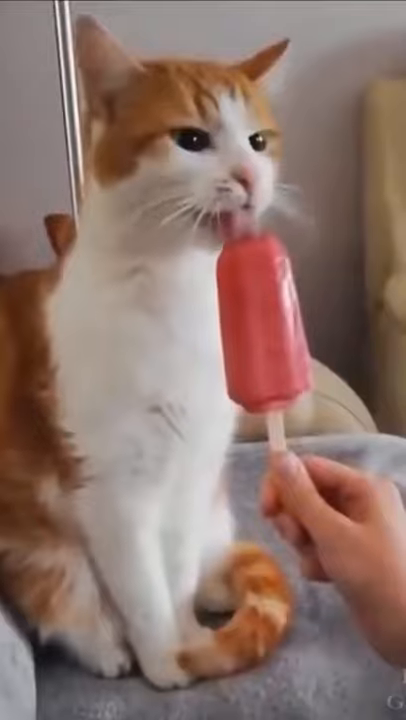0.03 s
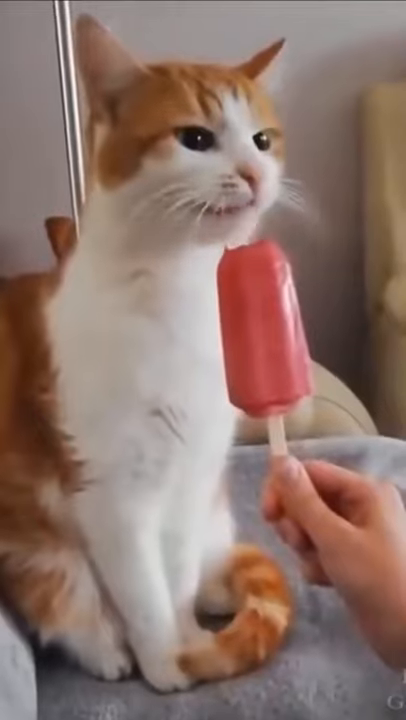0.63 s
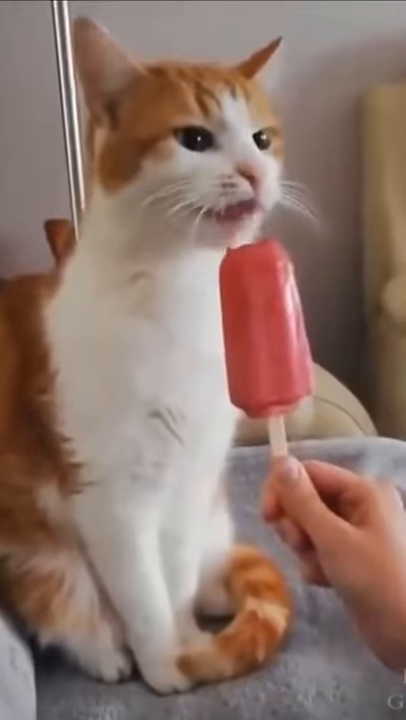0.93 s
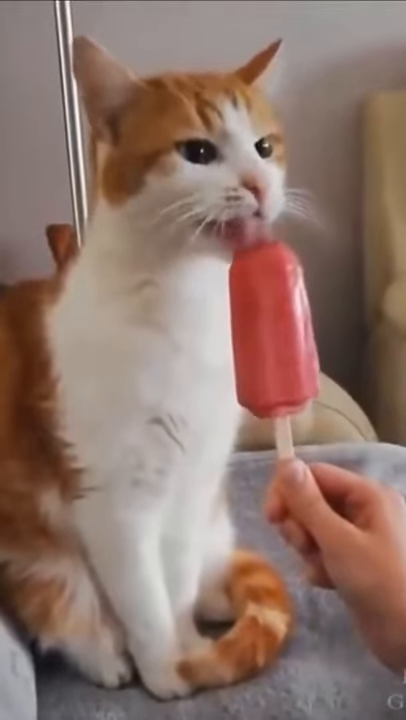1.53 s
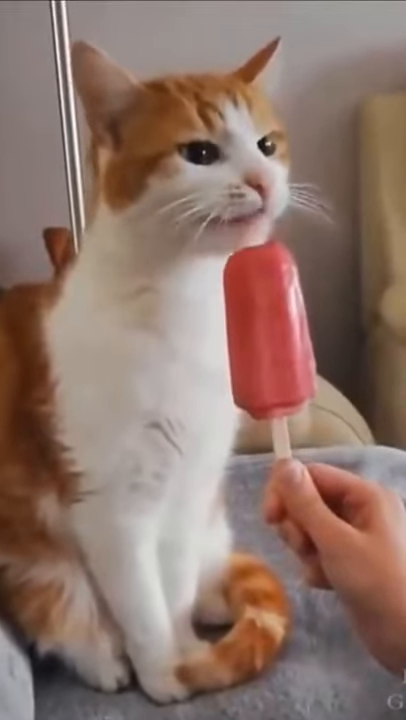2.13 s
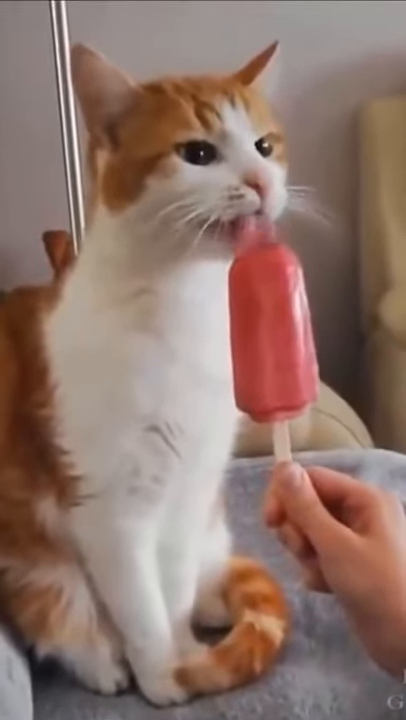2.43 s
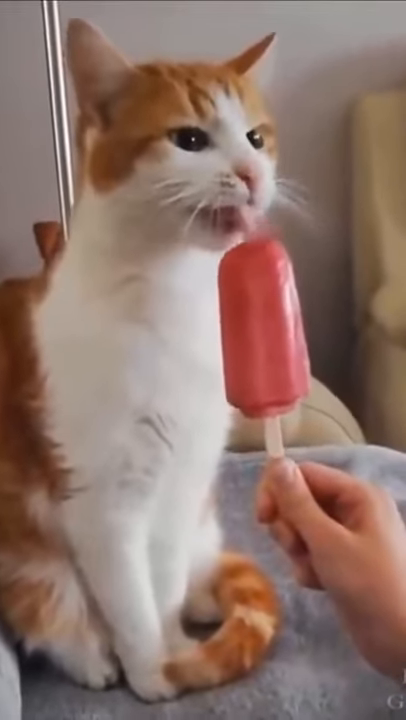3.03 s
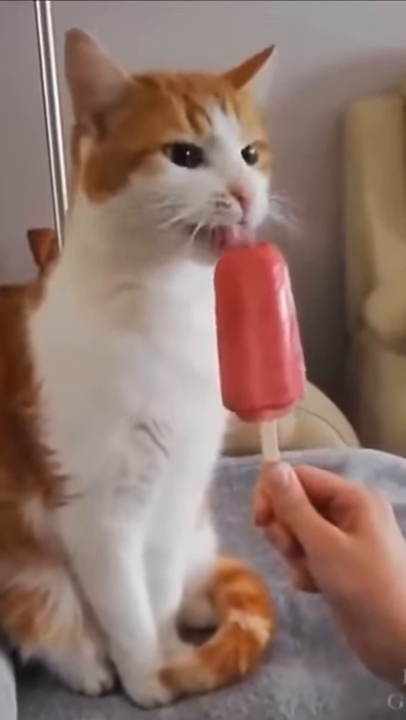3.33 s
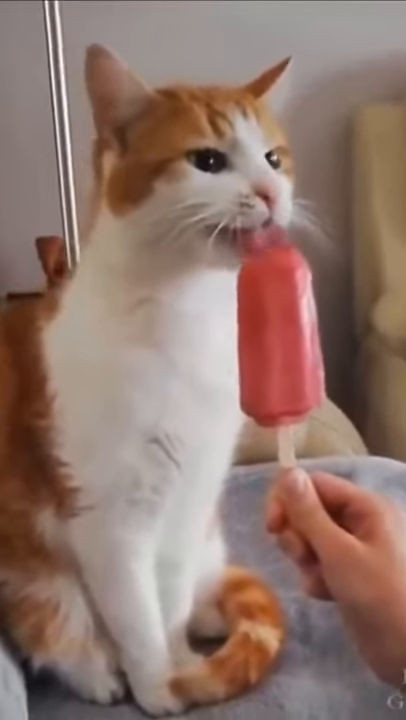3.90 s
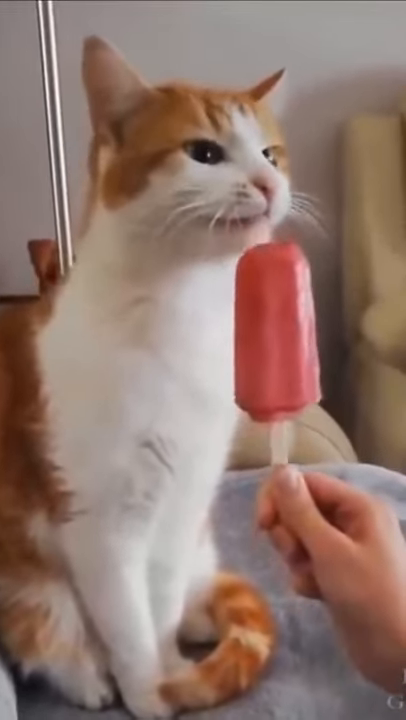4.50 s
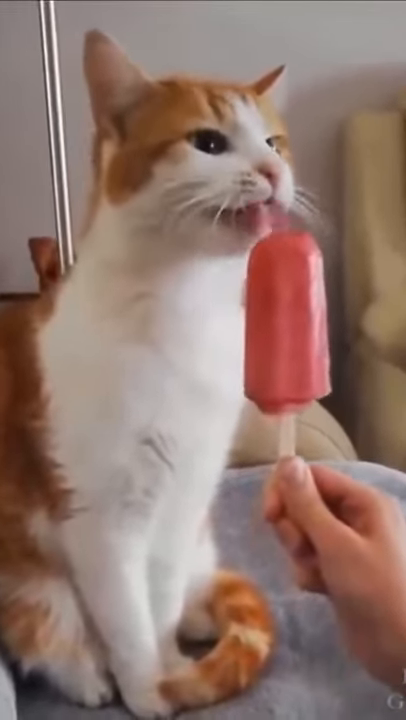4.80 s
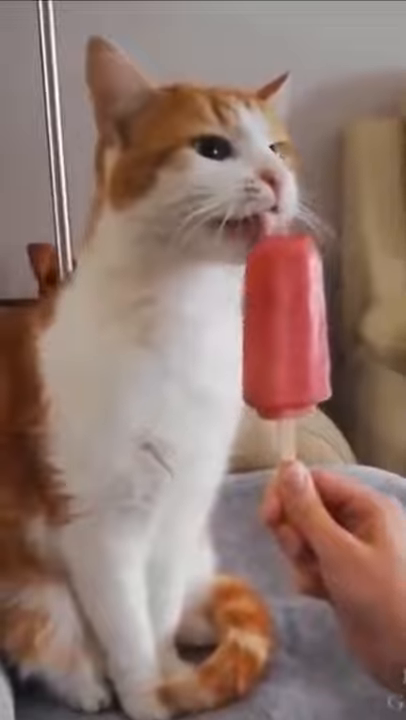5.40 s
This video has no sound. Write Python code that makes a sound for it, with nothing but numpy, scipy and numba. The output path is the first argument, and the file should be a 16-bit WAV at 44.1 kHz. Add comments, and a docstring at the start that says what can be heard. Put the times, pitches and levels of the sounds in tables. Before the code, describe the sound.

A cat licks a frozen treat very close to the microphone, in a quiet room with no echo. From the very start, wet smacks and tongue clicks come several times a second in an uneven rhythm. Each lick has a bright crackle of saliva, a short, hollow smack and a soft, low thump as the tongue lets go. Brief sticky drags and tiny bubble snaps fall in between.

The licks are strong through the first second, ease briefly around 1.5 to 1.8 seconds, and stand out again near 2.5 seconds and from 2.9 to 3.7 seconds. After about 4 seconds they are somewhat lighter, with a few small plops and clearer smacks near 4.4 and 4.8 seconds. A faint rumble and thin hum lie underneath, growing slightly. The last lick comes at about 5 seconds, and everything falls silent by 5.2 seconds.

```python
"""Close, wet licking

Wet licking and smacking mouth sounds, very close by, several a second, in a quiet room with no echo.
In each lick a film of saliva tears with a bright crackle, the tongue peels off in tiny pops that make
the opening mouth ring, and it lets go with a soft, low thump. Now and then the tongue drags, bubbles
snap and air pockets plop, all over a faint rumble and hum."""
import sys
import numpy as np
from scipy import signal
from scipy.fft import rfft, irfft
from scipy.io import wavfile
from scipy.ndimage import uniform_filter1d
from numba import njit

SR = 44100
rng = np.random.default_rng(int(sys.argv[2]) if len(sys.argv) > 2 else 0)


def log_audio(samples):
    """Write samples as a 16-bit WAV file to the path given in sys.argv[1]."""
    # one column per channel
    frames = np.atleast_2d(samples).T
    # limit to full scale, then quantise
    limited = np.clip(frames, -1, 1)
    pcm = np.round(limited * 32767).astype(np.int16)
    wavfile.write(sys.argv[1], SR, pcm)


N = 249297

# The licks. Each row: start in seconds, contact time in seconds, smack level in dB, mouth pitch in Hz,
# throat level in dB compared with the mouth, film level in dB, film pitch in Hz, thump level in dB.
# Levels in all tables are relative: they say which sounds are louder than others.
LICKS = [(.003,0.04,-17.5,1490,-6.5,-25.5,3030,-25.5), (0.182,.009,-19.5,1465,-9,-28,3680,-24),
         (.234,.026,-19,1320,-10.5,-31,2680,-19.5), (.28,0.011,-15.5,1215,-6.5,-32.5,2290,-26.5),
         (.431,0.048,-16.5,1180,-7,-27.5,3320,-9.5), (.645,0.039,-17,1510,-5.5,-18,2590,-17.5),
         (.803,0.045,-14,1200,-6.5,-34.5,2270,-16.5), (1.004,.015,-36.5,1120,-1,-30.5,2590,-36.5),
         (1.031,.006,-22,1460,-6.5,-20,3480,-34), (1.149,0.05,-21,1445,-3,-34,5100,-16),
         (1.236,0.064,-15.5,1334,-5,-31.5,2310,-35), (1.316,0.06,-32,1620,-2,-47.5,5130,-25.5),
         (1.494,0.024,-23,1350,-3,-24,2920,-16), (1.542,0.068,-41,1160,8.5,-54,2770,-39.5),
         (1.65,0.073,-29.5,1340,-2.5,-25.5,2960,-25), (1.773,0.0048,-35,1300,-2,-27.5,2900,-21),
         (1.881,0.045,-21.5,1370,-2,-17.5,2860,-24), (2.036,0.041,-18.5,1244,-12.5,-28,2380,-30),
         (2.098,0.026,-24.5,1090,-14,-40,2250,-23), (2.134,0.0062,-21,1104,-2.5,-44,2280,-20),
         (2.263,.015,-19.5,1010,-3,-32.5,4050,-16), (2.298,0.026,-33.5,1300,1,-21,2550,-13.5),
         (2.479,0.032,-14,1184,-4,-27,2820,-12), (2.636,.016,-29.5,1550,-4,-33,2800,-29.5),
         (2.737,0.0088,-27.5,1660,0,-26.5,4140,-29.5), (2.884,0.023,-15,1640,-8,-19.5,4030,-15.5),
         (3.051,.022,-14,1720,-11,-26.5,4330,-19.5), (3.248,0.0206,-17,1630,-4,-23.5,4630,-18),
         (3.413,.01,-21,1930,-2.5,-26.5,4340,-20), (3.503,0.01,-31,1600,-2,-28.5,4230,-34.5),
         (3.677,0.0078,-16.5,1410,-4.5,-22,3980,-15), (3.722,0.038,-29,1600,-9,-33,4100,-38),
         (3.886,0.012,-22,1340,-8.5,-28,3300,-18), (4.171,0.014,-28,1660,-4.5,-29.5,4430,-13.5),
         (4.222,0.017,-31.5,1700,0,-37,3130,-40), (4.312,0.023,-28,1200,-3.5,-29,3500,-16.5),
         (4.418,0.033,-19.5,1180,-4.5,-35,4220,-24), (4.69,0.013,-31,1130,-20,-29,2360,-40.5),
         (4.73,0.0035,-25.5,870,-5,-43,3200,-42), (4.79,0.026,-18.5,930,-3,-23,3640,-15.5),
         (5.008,.012,-27,1345,-1,-33,2570,-29.5)]
# The tongue dragging, tearing a film with no smack. Each row: start in seconds,
# contact time in seconds, level in dB, pitch in Hz, slide in octaves per 50 ms.
TONGUE_DRAGS = [(0.783, 0.0095, -23, 2390, 1.8), (1.172, 0.048, -23, 3930, -1.04),
                (1.328, 0.029, -29.5, 2340, 1.8), (1.624, 0.037, -27.5, 4360, 0.5),
                (1.664, 0.048, -23, 5200.0, 1.2), (2.467, 0.0028, -24.5, 4220, 1.8),
                (3.823, 0.066, -27.5, 3860, -0.2), (4.089, 0.025, -31.5, 3650, -0.33),
                (4.277, 0.041, -26.5, 2900.0, -0.1), (4.843, 0.041, -34.5, 4020, -0.45),
                (4.991, 0.013, -27, 3940, -2)]
# Single bubbles bursting. Each row: start in seconds, level in dB, pitch in Hz.
BUBBLE_SNAPS = [(0.181, -25, 1260), (0.4241, -16, 1380), (0.7622, -29, 2960), (0.986, -29.5, 1350),
                (1.1482, -31.5, 4260), (1.6079, -20.5, 3120), (2.0164, -22.5, 1460), (2.1821, -17, 1140),
                (2.6355, -21, 2350), (3.5026, -23, 4500), (3.583, -35, 2580), (3.7973, -32, 6890),
                (3.806, -27.5, 3970), (4.086, -31, 1700), (4.275, -26, 3560), (4.417, -45, 1200),
                (4.6426, -42, 3970), (4.789, -22.5, 1010), (4.987, -61, 5890), (5.059, -25, 1270)]
# Small air pockets. Each row: start in seconds, level in dB, starting pitch in Hz,
# slide in octaves per second, thump level in dB.
AIR_PLOPS = [(4.002, -22, 750, -73, -14), (4.129, -29.5, 676, -150, -25), (4.678, -23.5, 3160, -110, -37),
             (5.121, -30.5, 800, -39, -25.5)]
# The tone of the mouth from close by. Each row: frequency in Hz, boost or cut in dB.
MOUTH_TONE = [(220, 7), (420, 2.5), (620, 6.5), (800, 5.5), (1200, 5), (1750, -0.5), (2300, -5.5),
              (3600, 0), (4700, -3), (6000, 11), (9000, 1), (13000, 0.5)]
# The tone of the room's noise. Each row: frequency in Hz, level in dB.
ROOM_TONE = [(15, -20), (45, 0), (280, -12), (750, -21), (1600, -17), (2400, -29), (5000, -40),
             (13000, -44)]
# How loud the room is over time. Each row: time in seconds, level in dB.
ROOM_LOUDNESS = [(0, -36.5), (5.153, -31.5), (5.171, -94)]


def tongue_smacks():
    """The tongue peels off in pops that ring the throat and two rising notes of the opening mouth."""
    out = np.zeros((2, N))
    for start, contact, db, hz, throat_db, *_ in LICKS:
        t, _, sudden_swell, progress = stroke(start, contact, fall_s=.03)
        pitch = hz * 2 ** (.054 * progress)
        peel = reflections(pops(t, rate=300, spread_db=4, hiss=.28), depth=.5, ring_s=.002)
        mouth = resonance(peel, pitch, q=2.2) + undb(-14) * resonance(peel, pitch * 2.6, q=4.5)
        mouth += .6 * tiny_bubbles(pitch, rate=220, scatter_octaves=.22, ring_cycles=4)
        throat = resonance(reflections(peel, depth=1.0, ring_s=.0033), hz=382, q=.53)
        smack = even_out(mouth, span_s=.022) + undb(throat_db) * even_out(throat, span_s=.02)
        add(out, stereo(smack * sudden_swell * undb(db), width=.028), start + t[0])
    return out


def saliva_films():
    """A film tears in a crackle of pops and bubbles that rings a narrow pocket."""
    out = np.zeros((2, N))
    lead_s = .005  # the film tears just before the smack
    lick_films = [(start - lead_s, contact + lead_s, db, hz, 0)
                  for start, contact, _, _, _, db, hz, _ in LICKS]
    for start, contact, db, hz, slide in lick_films + TONGUE_DRAGS:
        t, swell, sudden_swell, progress = stroke(start, contact, fall_s=.038)
        pitch = hz * 2 ** (slide * progress)
        tear = reflections(pops(t, rate=430, spread_db=5, hiss=.42), depth=1.2, ring_s=.004)
        crackle = resonance(tear, pitch, q=1.1) + .78 * resonance(tear, pitch, q=8.4)
        crackle += .7 * tiny_bubbles(pitch, rate=380, scatter_octaves=.36, ring_cycles=10)
        crackle = even_out(crackle, span_s=.021) * sudden_swell
        # A soft, high hiss swells and fades around each crackle.
        hiss = undb(-6) * even_out(resonance(tear, hz=10050, q=.46), span_s=.059) * swell
        film = stereo(crackle, width=.17 * hz / 4000) + stereo(hiss, width=.25)
        add(out, film * undb(db), start + t[0])
    return out


def thumps():
    """The tongue letting go, or a plop, nudges the air: a low note that sinks as it dies away."""
    out = np.zeros((2, N))
    t = np.arange(SR // 6) / SR
    envelope = (1 - np.exp(-t / .0014)) * np.exp(-t / .014)
    envelope /= envelope.max()
    after_licks = [(start + contact + .002, db) for start, contact, *_, db in LICKS]
    with_plops = [(start, db) for start, *_, db in AIR_PLOPS]
    for start, db in after_licks + with_plops:
        hz = 107.4 * 2 ** (.12 * rng.standard_normal())
        pitch = hz * (.5 + 1.53 * np.exp(-t / .0061))
        add(out, np.sin(2 * np.pi * np.cumsum(pitch) / SR) * envelope * undb(db), start)
    return out * undb(4.5)


def bubble_snaps():
    """A bubble bursts in an instant and rings briefly; louder ones ring longer."""
    out = np.zeros((2, N))
    t = np.arange(SR // 30) / SR
    for start, db, hz in BUBBLE_SNAPS:
        q = 1.15 * 2 ** ((db + 26) / 6)  # doubles with every 6 dB
        burst = .83 * rng.standard_normal(len(t)) * np.exp(-t / .0024)
        burst[0] = 1
        add(out, stereo(resonance(burst, hz, q) * undb(db), width=.063), start)
    return out * undb(-6.5)


def air_plops():
    """A pocket of air opens or closes under the tongue, and its note slides down."""
    out = np.zeros((2, N))
    t = np.arange(SR // 40) / SR
    decay_s = .0056
    envelope = t / decay_s * np.exp(2 - 2 * t / decay_s) * (1 - t / t[-1])
    for start, db, hz, slide, _ in AIR_PLOPS:
        ring = resonance(pops(t, rate=500, spread_db=2, hiss=.5), hz * 2 ** (slide * t), q=2.7)
        add(out, undb(db) * even_out(ring, span_s=.005) * envelope, start)
    return out


def room():
    """Faint noise, an uneven rumble and a thin hum grow slowly, then stop after the last lick."""
    t = np.arange(N) / SR
    times, levels_db = np.transpose(ROOM_LOUDNESS)
    noise = undb(-3.5) * unit(shape_tone(rng.standard_normal((1, N)), ROOM_TONE))
    wander = resonance(rng.standard_normal(N), hz=5.1, q=.5)
    rumble = resonance(rng.standard_normal(N), hz=42, q=.8) * undb(4.5 * wander + 2)
    hum = undb(-11.5) * np.sin(2 * np.pi * 301 * t)
    return (noise + rumble + hum) * undb(np.interp(t, times, levels_db))


def stroke(start, contact, fall_s):
    """One tongue movement swells, holds and fades; a snapping bubble sets it off faster."""
    near_snap = any(abs(start - snap_time) < .008 for snap_time, *_ in BUBBLE_SNAPS)
    rise_s = .0076 if near_snap else .015
    t = np.arange(int(-1.4 * rise_s * SR), int((contact + 2 * fall_s) * SR)) / SR
    swell = undb(-13 * np.maximum(-t, 0) / rise_s - 20 * np.maximum(t - contact, 0) / fall_s)
    sudden_swell = swell * (t > -.45 * rise_s)  # breaks loose all at once
    progress = np.clip((t - contact / 2) / .05, -.7, .7)  # from mid-contact, in units of 50 ms
    return t, swell, sudden_swell, progress


def pops(t, rate, spread_db, hiss):
    """Wet surfaces part in uneven pops, roughly `rate` a second, over a fine hiss."""
    gap, direction, strength = rng.standard_normal((1200, 3)).T
    starts = (np.cumsum(np.exp(.55 * gap)) * SR / rate).astype(int)
    size = np.sign(direction) * undb(spread_db * np.clip(strength, -2, 2))
    inside = starts < len(t)
    clicks = np.zeros(len(t))
    clicks[starts[inside]] = size[inside]
    clicks[0] += 1
    return unit(clicks) + hiss * rng.standard_normal(SR)[:len(t)]


def tiny_bubbles(hz, rate, scatter_octaves, ring_cycles):
    """Each tiny bubble rings with its own rising pitch near hz; a few stand out."""
    gap, detune, strength = rng.standard_normal((400, 3)).T
    starts = (np.cumsum(np.exp(gap / 2)) * SR / rate).astype(int)
    inside = starts < len(hz)
    age = np.arange(300)  # in samples
    pitch = hz[starts[inside]] * 2 ** (scatter_octaves * np.clip(detune[inside], -2, 2))
    cycles = pitch[:, None] * age / SR
    ring = np.sin(2 * np.pi * cycles * (1 + age / 4000)) * np.exp(-cycles / ring_cycles)
    size = np.exp(np.clip(strength[inside, None], -2, 2) / 2)
    positions = starts[inside, None] + age
    mixed = np.bincount(positions.ravel(), (size * ring).ravel(), len(hz))  # adds up the bubbles
    return unit(mixed[:len(hz)] + 1e-9)


def even_out(x, span_s):
    """The tongue pulls evenly, so the strength of the pops evens out."""
    return x / np.sqrt(uniform_filter1d(x ** 2, int(span_s * SR) + 1) + .011)


def reflections(x, depth, ring_s):
    """Sound bounces between tongue and lips, differently for each stroke."""
    t = np.arange(256) / SR
    echoes = depth * unit(rng.standard_normal(len(t)) * np.exp(-t / ring_s)) / np.sqrt(len(t))
    echoes[0] = 1
    return signal.fftconvolve(x, echoes)[:len(x)] / np.sqrt(1 + depth ** 2)


def stereo(x, width):
    """The sound scatters differently to the left and to the right."""
    return x + width * np.array([[1], [-1]]) * reflections(x, depth=10.65, ring_s=.002)


def resonance(x, hz, q):
    """Ring like a hollow space near hz; a higher q gives a clearer, longer note."""
    centre = hz * np.ones(len(x))
    return unit(band_pass(band_pass(x, centre, float(q)), centre, float(q)))


@njit
def band_pass(x, hz, q):
    """Let through the sound near a pitch that may move with every sample."""
    out, band_state, low_state = np.empty(len(x)), 0., 0.
    for i in range(len(x)):
        tuning = np.tan(np.pi * min(hz[i], .44 * SR) / SR)
        band = (band_state + tuning * (x[i] - low_state)) / (1 + tuning * (tuning + 1 / q))
        band_state = 2 * band - band_state
        low_state += 2 * tuning * band
        out[i] = band / q
    return out


def shape_tone(x, points):
    """Boost and cut frequencies along a curve of (Hz, dB) points."""
    hz, db = np.transpose(points)
    grid_hz = np.fft.rfftfreq(4096, 1 / SR)
    gain = undb(np.interp(np.log(grid_hz + 1), np.log(hz), db))
    # Build the filter so that it rings only after a sound, never before.
    cepstrum = irfft(np.log(gain))
    half = len(cepstrum) // 2
    cepstrum[1:half] *= 2
    cepstrum[half + 1:] = 0
    response = irfft(np.exp(rfft(cepstrum)))
    return signal.fftconvolve(x, response[None], axes=1)[:, :N]


def add(track, sound, start_s):
    """Mix a sound into the track at the given time."""
    start = int(start_s * SR)
    first, end = max(start, 0), min(start + sound.shape[-1], N)
    track[:, first:end] += sound[..., first - start:end - start]


def undb(db):
    """Turn decibels into a number to multiply by."""
    return 10 ** (np.asarray(db) / 20)


def unit(x):
    """Scale to an average strength (rms) of 1."""
    return x / np.sqrt(np.mean(x ** 2))


def scene():
    """Wet mouth sounds and low thumps over the quiet room."""
    mouth = tongue_smacks() + saliva_films() + bubble_snaps() + air_plops()
    return shape_tone(mouth, MOUTH_TONE) + thumps() + room()


def record(dry):
    """Round off the loudest peaks and cut the highest treble."""
    ceiling, top_hz = 1.1, 13200
    low_pass = signal.ellip(8, .2, 70, top_hz, fs=SR, output="sos")
    return signal.sosfilt(low_pass, ceiling * np.tanh(dry / ceiling))


dry = scene()
out = record(dry)
log_audio(out)
```